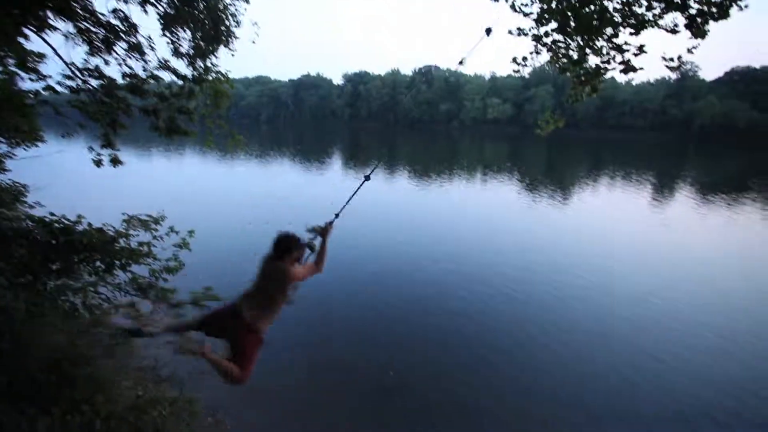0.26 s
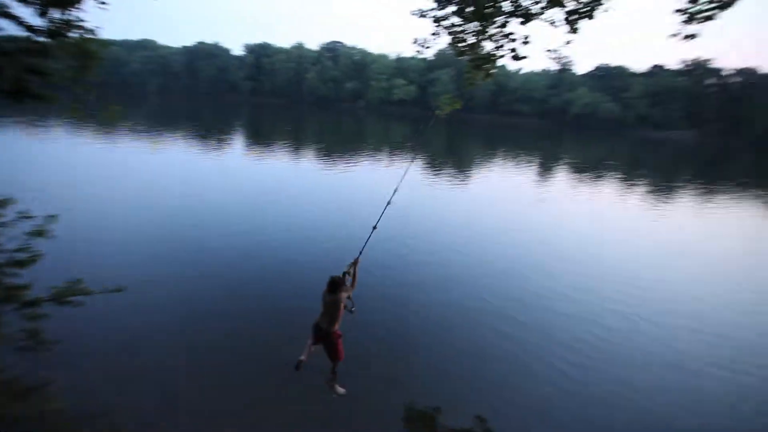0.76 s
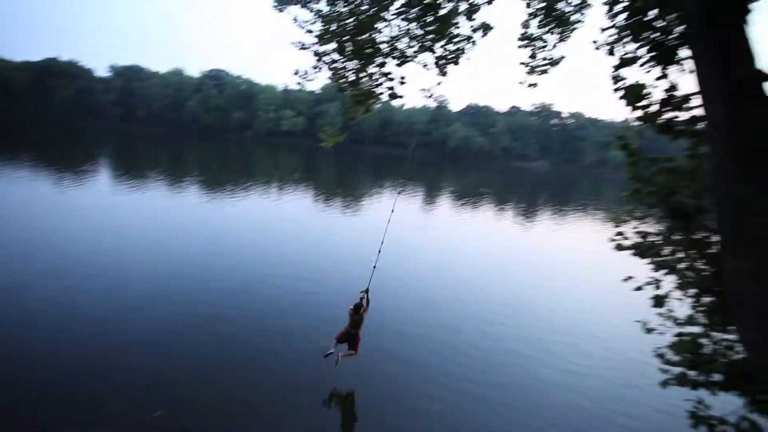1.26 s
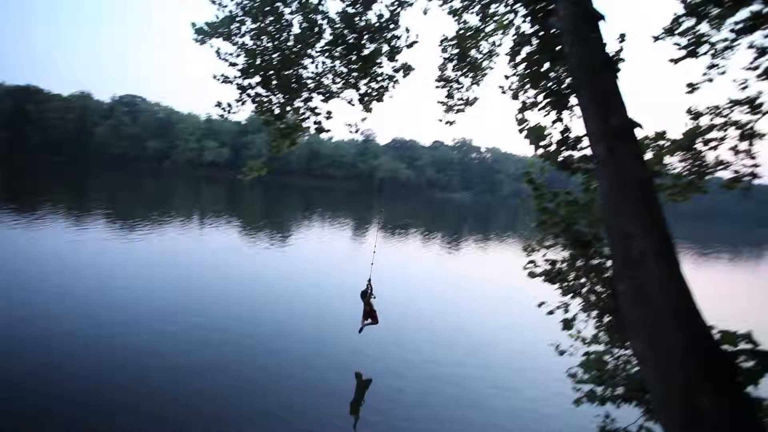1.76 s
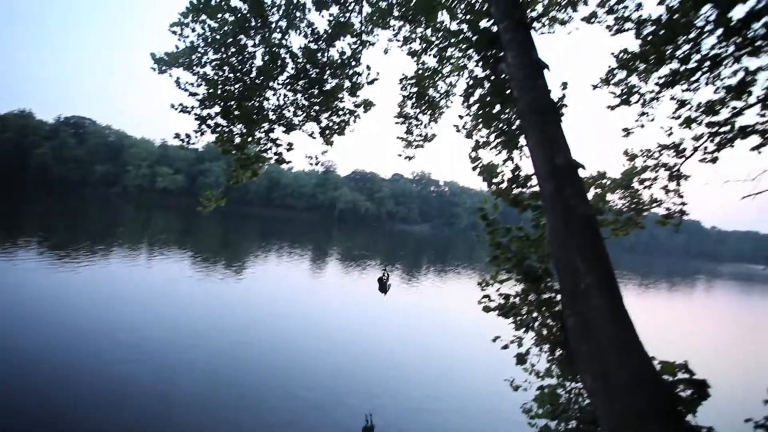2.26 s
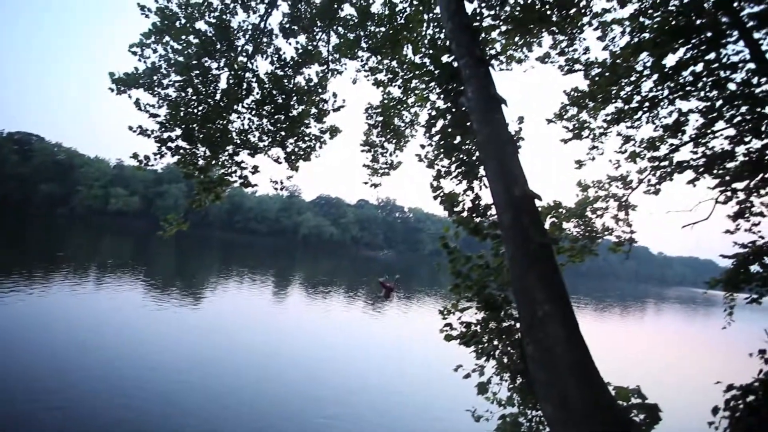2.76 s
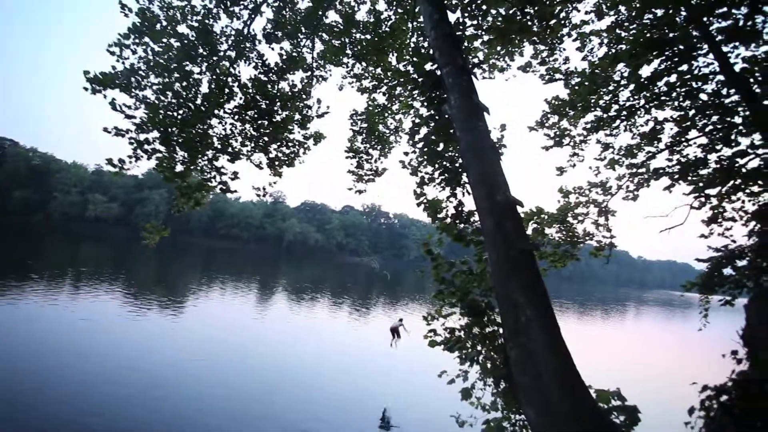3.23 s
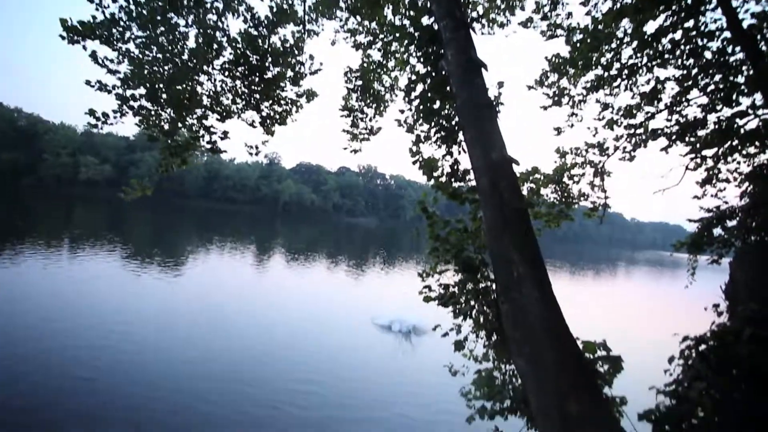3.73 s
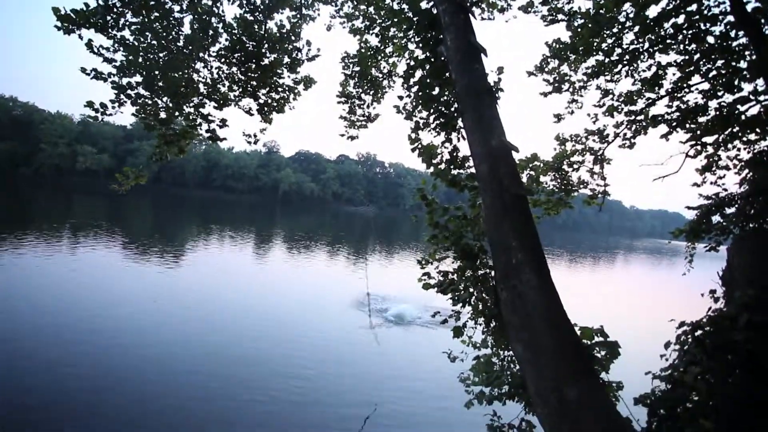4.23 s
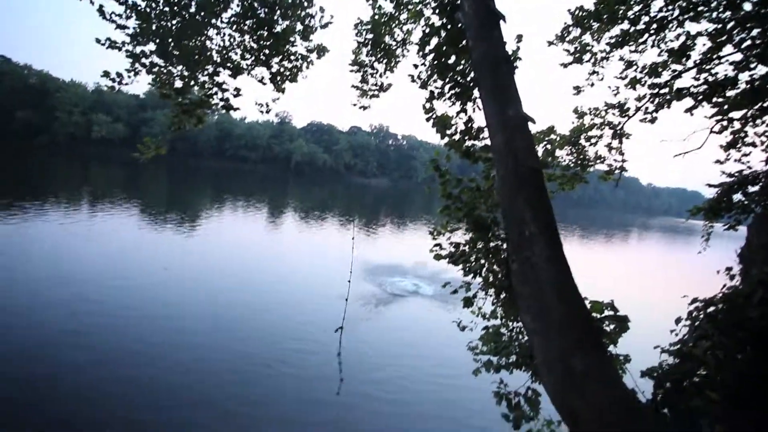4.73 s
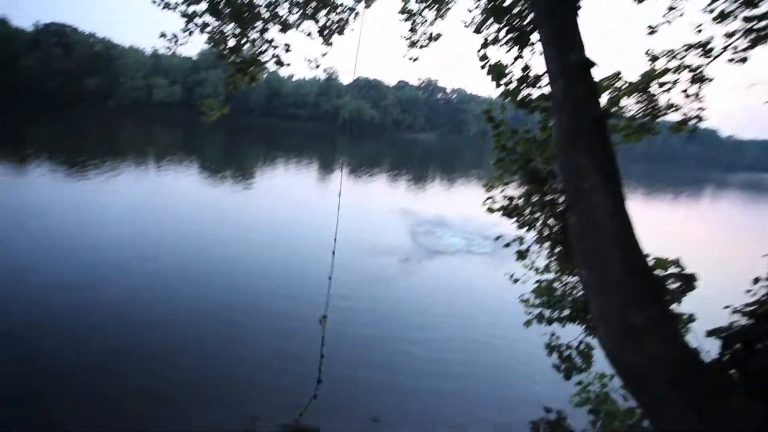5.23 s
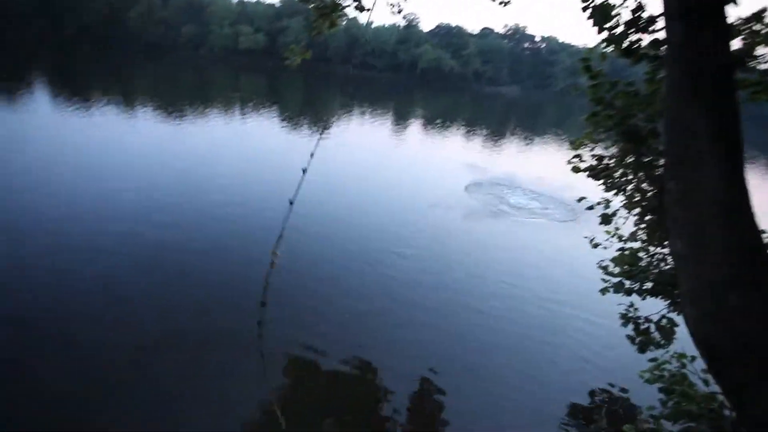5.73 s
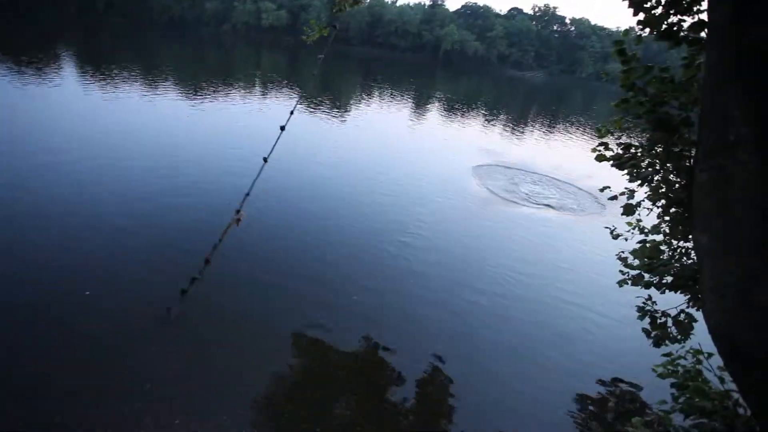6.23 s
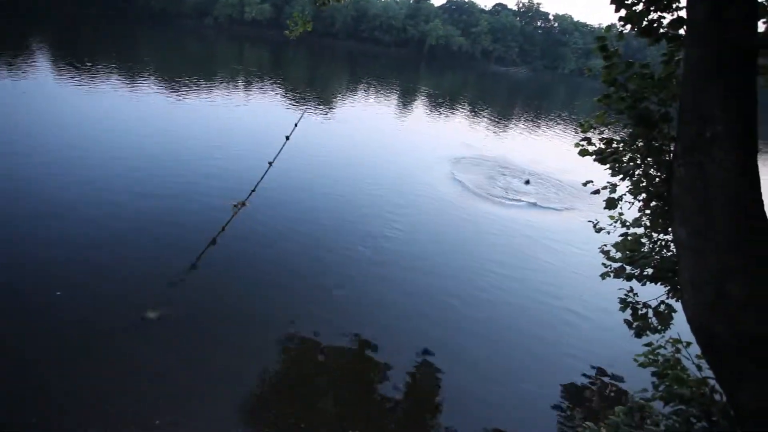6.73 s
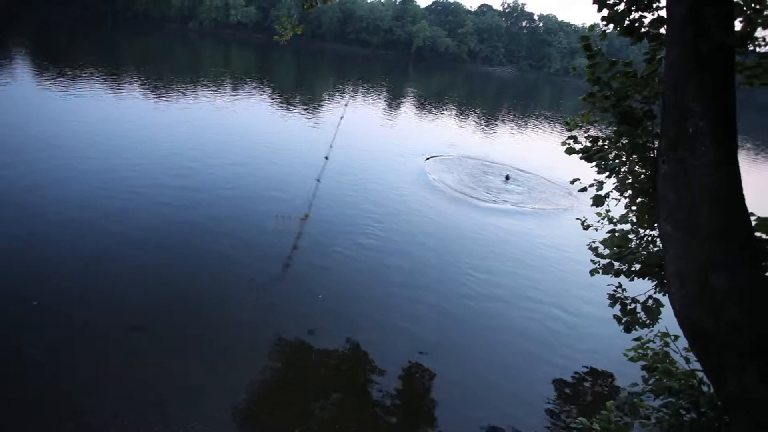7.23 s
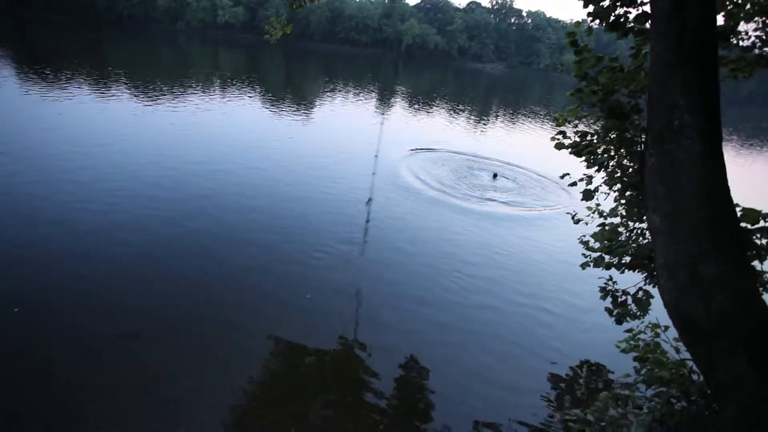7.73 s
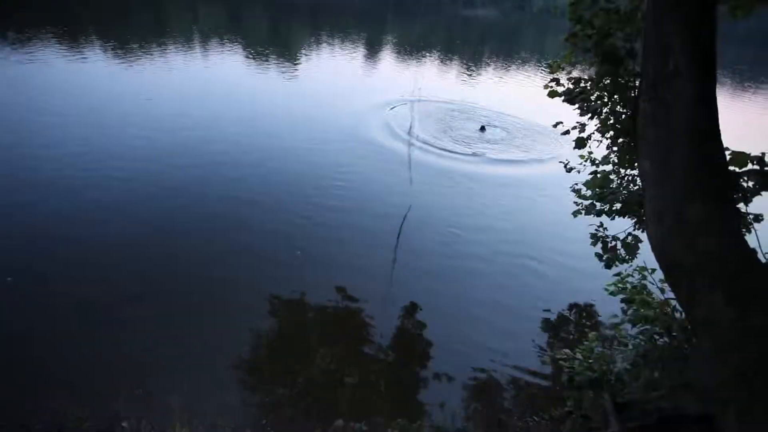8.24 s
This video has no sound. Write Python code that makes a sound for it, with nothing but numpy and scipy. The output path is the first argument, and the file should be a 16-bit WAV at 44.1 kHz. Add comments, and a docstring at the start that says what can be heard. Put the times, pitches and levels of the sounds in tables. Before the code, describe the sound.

Shrill cicadas run unbroken over a very low outdoor murmur. Right at the start comes a dry rope snap with a brief leafy brush, then a small woody creak. A single loud splash follows, cracking and overloading the mono microphone, with low booming air and a spray that patters away. Near the end a swimmer sloshes quietly, drops plink, and leaves stir slightly before an abrupt stop.

```python
"""Evening on a wooded lake shore: throughout, cicadas hiss as resonance-shaped noise over far rumble and murmur.
First a rope grip snaps (damped modes) and leaves rustle (grainy noise); about 2 s the rope creaks on its branch.
From 3.5 s the rider slaps the water (decaying noise), trapped air booms (gliding sines), froth and thrown water follow.
From 6.5 s a swimmer sloshes in bubbly gushes, single drops ring, and near the end leaves stir on the bank.
The mono microphone clips on the slaps; its gain control ducks after them and slowly recovers."""
import sys
import numpy as np
from scipy import signal
from scipy.fft import rfft, irfft, next_fast_len
from scipy.io import wavfile
from scipy.ndimage import uniform_filter1d, map_coordinates

SR = 44100
rng = np.random.default_rng(int(sys.argv[2]) if len(sys.argv) > 2 else 0)


def gain_from_db(level_db):
    """Convert decibel levels to linear amplitude factors (20 dB per decade)."""
    decades = np.asarray(level_db, float) / 20
    return 10 ** decades


def generate_wav(sig):
    """Save sig (samples, or channels by samples) to the path in sys.argv[1] as 16-bit PCM at SR."""
    pcm = np.round(np.clip(np.atleast_2d(sig).T, -1, 1) * 32767).astype(np.int16)
    wavfile.write(sys.argv[1], SR, pcm)


N = 374409

# Spectra below list relative spectral density; the layer is then normalised and given its own level.
# cicada chorus: t/s, level/dB
CHORUS_LEVEL = [(0, -13), (2, -13), (3.4, -12.5), (4.3, -11.5), (5.2, -13), (8.4, -12)]
# body resonance of the insects: f/Hz, level/dB
CICADA_SPECTRUM = [(1900, -49), (3200, -31.5), (4350, -11.5), (5180, -9), (6210, 0), (7250, -3),
                   (8870, -12), (10100, -26), (11000, -35), (12500, -38.5), (14000, -45), (16000, -52)]
# distant background: t/s, murmur level/dB, rumble level/dB
FAR_LEVELS = [(0, -31, -37), (.5, -33, -41.5), (1.3, -34, -39.5), (3.4, -35.5, -38), (6, -37, -40),
              (8.4, -39.5, -41.5)]
# far murmur: f/Hz, level/dB
MURMUR_SPECTRUM = [(120, -24.5), (200, -6.5), (318, -8), (391, -13.5), (520, -14.5), (656, -12), (1530, -9),
                   (2570, -18.5), (3500, -19), (4550, -53)]
# far rumble: f/Hz, level/dB
RUMBLE_SPECTRUM = [(20, -29.5), (32, -16), (52, 0.5), (100, -1), (180, -2), (300, -13.5), (500, -34)]
# wavering low tones: f/Hz, width/Hz, level/dB
DRONE_TONES = [(86.4, 13, -43.5), (107.8, 2.4, -46)]
# envelope of a throbbing low tone: t/s, level/dB, hold/s, rise/(dB/s), fall/(dB/s)
HUM_ENVELOPE = (0.8, -39.5, 2, 90, 5.5)
HUM_HZ, BEAT_HZ, BEAT_DEPTH = 225.3, 14, 0.57

# rope grip snapping tight: t/s, level/dB
GRIP_SNAP = (.039, 0.96)
# modes of the grip: f/Hz, relative level/dB, t60/s
GRIP_MODES = [(1930, -1.5, 0.024), (2460, -2.5, 0.019), (3530, 8, 0.0084), (10500, -36.5, .006)]
# leaves brushed at take-off, later stirred on the bank: t/s, level/dB, hold/s, rise/(dB/s), fall/(dB/s)
LEAF_RUSTLES = [(0.152, -12, 0.046, 221, 109), (8.2, -33, .2, 40, 100)]
# rustling leaves: f/Hz, level/dB
LEAF_SPECTRUM = [(500, -20), (1200, -11.5), (2500, -7), (4000, -1.5), (7000, 6.5), (13000, -18),
                 (16000, -19.5)]
# rope slipping on its branch: t/s, level/dB
ROPE_CREAKS = [(2.125, -29), (2.15, -26.5), (2.18, -22.5), (2.24, -26.5)]
# modes of the branch: f/Hz, relative level/dB, t60/s
BRANCH_MODES = [(550, 5.5, 0.047), (990, 1, 0.035), (1550, 0, .03)]

# churned, then falling water: t/s, level/dB, treble lean/dB
WATER_LEVELS = [(3.47, -84, -0.5), (3.475, -15, 1.5), (3.56, -15.5, 0.5), (3.61, -16, 9), (3.72, -18, 3),
                (3.95, -19, 0.5), (4.2, -14.5, 1.5), (4.7, -20, -0.5), (5.5, -30, -2), (6.4, -54.5, -5.5)]
# falling water: f/Hz, level/dB
SPRAY_SPECTRUM = [(120, -20), (250, -5), (450, -4.5), (660, -4), (850, -2.5), (1200, 0.5), (1450, -3.5),
                  (1700, -1.5), (2500, -2), (5000, 0.5), (9000, -3), (13000, -20), (16000, -28)]
# froth at the impact and under the falling water: t/s, level/dB, hold/s, rise/(dB/s), fall/(dB/s)
FROTH_BURSTS = [(3.472, -24.5, 0.065, 9000, 60), (4.45, -28.5, .2, 11, 19)]
# favoured froth bubbles: f/Hz, relative share
FROTH_BUBBLES = [(430, 1), (540, 1), (648, 3), (1192, 2), (1650, 1)]
# limbs and body slapping the surface: t/s, level/dB, t60/s, centre of the crack f/Hz
WATER_SLAPS = [(3.476, -5.5, 0.018, 4200), (3.488, -21.5, 0.0065, 8000), (3.511, -4, 0.022, 3200),
               (3.571, 2.5, .003, 9000), (3.591, 8.5, 0.0064, 6470), (3.593, 10.5, 0.0072, 5080)]
# trapped air ringing as bubbles: t/s, f/Hz, level/dB
AIR_CAVITIES = [(3.476, 1106, -4), (3.511, 685, 6), (3.518, 130, -13), (3.52, 550, 1), (3.591, 1730, 8),
                (3.5905, 4900, 8.5), (3.701, 133, -3.5), (3.801, 159, -5), (3.951, 168, -13),
                (3.96, 395, -15), (3.976, 201, -12)]
CAVITY_CYCLES, CAVITY_LEAST_S = 11, 0.0053  # t60 = cycles / pitch + least
# the plunge hole closing in gulps: t/s, level/dB
PLUNGE_GULPS = [(3.485, -30.5), (3.525, -22.5), (3.71, -19.5), (3.82, -26.5), (3.97, -23.5)]
GULP_RISE, GULP_FALL = 390, 100  # dB/s
# gurgle of the plunge hole: f/Hz, level/dB
GURGLE_SPECTRUM = [(50, -21), (110, 4), (200, -1.5), (450, -4.5), (900, -38)]

# swimmer's gushes: t/s, hold/s, gush level/dB, froth level/dB
SWIM_STROKES = [(6.487, 0.018, -34.5, -38.5), (6.89, .03, -36, -39), (7.046, 0.028, -37, -45),
                (7.215, 0.014, -39, -46), (7.352, .15, -35, -40), (8.208, 0.056, -39, -41.5),
                (8.33, .1, -36, -35)]
STROKE_RISE, STROKE_FALL = 127, 200  # dB/s
# stirred water: f/Hz, level/dB
SLOSH_SPECTRUM = [(200, -10), (450, -1.5), (900, 0.5), (1350, -12), (2500, -1), (4000, -3.5), (14000, -16),
                  (16000, -25)]
# favoured bubbles of the strokes: f/Hz, relative share
SWIM_BUBBLES = [(946, 0.73), (1330, 4), (1900, 1)]
# single falling drops: t/s, f/Hz, level/dB
FALLING_DRIPS = [(7.17, 1400, -27), (7.558, 2600, -27), (7.965, 1330, -27), (8.225, 2900, -27),
                 (8.339, 1145, -23), (8.345, 2410, -20)]
DRIP_CYCLES = 95  # t60 in cycles

END_S, GAIN_LAG_S = 8.377, .008  # sound stops; delay of the gain control


def unit(x):
    """Normalisation to rms 1."""
    return x / np.sqrt(np.mean(x ** 2) + 1e-20)


def curves(rows):
    """Linear interpolation in time: one value per sample for each column after the time."""
    s, *columns = np.transpose(rows)
    return [np.interp(np.arange(N) / SR, s, column) for column in columns]


def wobble(rate):
    """Slow random modulation: a smooth curve through `rate` random knots a second."""
    knots = rng.standard_normal(int(N * rate / SR) + 4)
    return map_coordinates(knots, [np.arange(N) * rate / SR])


def filtered(x, response):
    """Linear filtering: the spectrum times a response of frequency, then rms 1."""
    size = next_fast_len(len(x) + 8192)
    hz = np.fft.rfftfreq(size, 1 / SR) + 1  # offset keeps the logarithm finite
    return unit(irfft(rfft(x, size) * response(hz), size)[:len(x)])


def coloured(x, spectrum):
    """Spectral shaping by points of f/Hz and level/dB on a logarithmic frequency axis."""
    f, db = np.transpose(spectrum)
    return filtered(x, lambda hz: gain_from_db(np.interp(np.log(hz), np.log(f), db, -120, -120)))


def grainy(share, scatter_db):
    """Granular noise: a power share of heavy-tailed samples of scattered size in Gaussian noise."""
    grains = rng.standard_normal(N) * gain_from_db(scatter_db * rng.standard_normal(N))
    share = np.clip(share, 0, 1)
    return np.sqrt(1 - share) * rng.standard_normal(N) + np.sqrt(share) * unit(grains)


def ring(modes, rise=0., attack=0.00052):
    """Modal decay: damped sines whose pitch glides up by the fraction 2 * rise over each t60."""
    t = np.arange(SR // 2) / SR
    onset = 1 - np.exp(-t / attack)
    return onset * sum(gain_from_db(db - 60 * t / t60) * np.sin(2 * np.pi * hz * t * (1 + rise * t / t60))
                       for hz, db, t60 in modes)


def add(track, s, sound):
    """Superposition: mixes a sound into the track at time s."""
    start = round(s * SR)
    track[start:][:len(sound)] += sound[:N - start]


def burst(s, db, hold, rise, fall):
    """Exponential envelope: gain climbs to db at time s, holds, then falls (rise and fall in dB/s)."""
    span = 120  # dB below the peak at either end
    times = [s - span / rise, s, s + hold, s + hold + span / fall]
    t = np.arange(N, dtype=np.float32) / SR
    return gain_from_db(np.interp(t, times, [db - span, db, db, db - span]).astype(np.float32))


def bubbles(count, span, sizes, spread, cycles):
    """Bubble resonance: random soft pings of rising pitch about favoured sizes; rms 1 over the span."""
    place, kind, size = rng.random((count, 3)).T[:, :, None]
    pitch_hz, share = np.transpose(sizes)
    chosen = np.searchsorted(np.cumsum(share), kind * share.sum())
    hz = pitch_hz[chosen] * np.exp(spread * rng.standard_normal((count, 1)))
    samples = np.arange(SR // 25)
    turns = hz * samples / SR
    envelope = turns * np.exp(-4 * turns / cycles)
    ping = np.sin(2 * np.pi * turns * (1 + 0.086 * turns / cycles / 2)) * envelope
    start = (SR * (span[0] + place * (span[1] - span[0]))).astype(int)
    track = np.bincount((start + samples).ravel(), (ping * gain_from_db(7.4 * size)).ravel(), N + SR)[:N]
    return unit(track) * np.sqrt((span[1] - span[0]) * SR / N)


def cicadas():
    """Resonant filtering: grainy noise, as of fused tymbal clicks, shaped by the insects' body resonance."""
    swell_db = 0.093 * wobble(1.8) + 0.27 * wobble(13) + 0.22 * wobble(120)
    hiss = coloured(grainy(share=0.27, scatter_db=3.5), CICADA_SPECTRUM)
    return gain_from_db(curves(CHORUS_LEVEL)[0] + swell_db) * hiss


def narrow_noise(centre_hz, width_hz):
    """Narrow-band resonance: noise confined about one frequency wavers like an unsteady tone."""
    return filtered(rng.standard_normal(N), lambda hz: 1 / (1 + ((hz - centre_hz) / width_hz * 2) ** 2))


def distance():
    """Band-limited noise and amplitude modulation: far murmur and rumble, low drones and a beating hum."""
    murmur_db, rumble_db = curves(FAR_LEVELS)
    murmur = gain_from_db(murmur_db + 0.42 * wobble(4.0)) * coloured(rng.standard_normal(N), MURMUR_SPECTRUM)
    rumble = gain_from_db(rumble_db + 0.97 * wobble(3.5)) * coloured(rng.standard_normal(N), RUMBLE_SPECTRUM)
    phase = 2 * np.pi * np.cumsum(HUM_HZ + 2.2 * wobble(8)) / SR
    beat_phase = 2 * np.pi * np.cumsum(BEAT_HZ + 0.53 * wobble(3.13)) / SR
    throb = 1 + BEAT_DEPTH * np.sin(beat_phase)
    hum = burst(*HUM_ENVELOPE) * gain_from_db(2.0 * wobble(2.4)) * unit(throb * np.sin(phase))
    drone = sum(gain_from_db(db) * narrow_noise(hz, width) for hz, width, db in DRONE_TONES)
    return murmur + rumble + drone + hum


def swing():
    """Impulse excitation of modes: the grip snaps and the branch creaks; brushed leaves give grainy noise."""
    rustle_gain = sum(burst(*row) for row in LEAF_RUSTLES) * gain_from_db(2.4 * wobble(50))
    out = rustle_gain * coloured(grainy(share=0.2, scatter_db=5.5), LEAF_SPECTRUM)
    snap_s, snap_db = GRIP_SNAP
    add(out, snap_s, gain_from_db(snap_db) * ring(GRIP_MODES))
    for s, db in ROPE_CREAKS:
        add(out, s, gain_from_db(db) * ring(BRANCH_MODES, attack=0.0026))
    return out


def thrown_water():
    """Random superposition of drops: grainy noise whose treble lean shifts the balance about 1500 Hz."""
    level_db, lean_db = curves(WATER_LEVELS)
    drops = coloured(grainy(share=0.48, scatter_db=6.5), SPRAY_SPECTRUM)
    bright = signal.lfilter(*signal.butter(1, 1500, "high", fs=SR), drops)
    dull = drops - bright
    return gain_from_db(level_db + 0.81 * wobble(25)) * (gain_from_db(-lean_db) * dull + gain_from_db(lean_db) * (drops - dull))


def slap(db, t60, centre_hz):
    """Broadband impact: a brief band of noise about centre_hz dies away exponentially."""
    t = np.arange(SR // 10) / SR
    crack = filtered(rng.standard_normal(len(t)),
                     lambda hz: 1 / np.hypot(1 + .25 * centre_hz / hz, (hz / centre_hz) ** 3))
    fade = gain_from_db(-60 * t / t60)
    return gain_from_db(db) * unit(crack * fade) * np.sqrt(np.mean(fade ** 2))


def splash():
    """Impact and cavity resonance: slaps, ringing air pockets, froth, a low gurgle and thrown water."""
    out = thrown_water()
    froth_gain = sum(burst(*row) for row in FROTH_BURSTS)
    out += froth_gain * bubbles(count=1800, span=(3.47, 6.4), sizes=FROTH_BUBBLES, spread=0.057, cycles=13.0)
    gulps = sum(burst(s, db, 0, GULP_RISE, GULP_FALL) for s, db in PLUNGE_GULPS)
    out += gulps * gain_from_db(1.3 * wobble(40)) * coloured(rng.standard_normal(N), GURGLE_SPECTRUM)
    for s, db, t60, centre_hz in WATER_SLAPS:
        add(out, s, slap(db, t60, centre_hz))
    for s, hz, db in AIR_CAVITIES:
        t60 = CAVITY_CYCLES / hz + CAVITY_LEAST_S
        add(out, s, ring([(hz, db, t60)], rise=0.033, attack=min(.003, 2.5 / hz)))
    return out


def swimmer():
    """Stirred flow and bubble resonance: arms make soft, frothy gushes; a few drops ring singly."""
    gush = sum(burst(s, db, hold, STROKE_RISE, STROKE_FALL) for s, hold, db, _ in SWIM_STROKES)
    froth = sum(burst(s, froth_db, hold, STROKE_RISE, STROKE_FALL) for s, hold, _, froth_db in SWIM_STROKES)
    out = gush * gain_from_db(0.89 * wobble(30)) * coloured(grainy(share=0.46, scatter_db=12.5), SLOSH_SPECTRUM)
    out += froth * bubbles(count=900, span=(6.3, 8.4), sizes=SWIM_BUBBLES, spread=0.042, cycles=13.4)
    for s, hz, db in FALLING_DRIPS:
        add(out, s, ring([(hz, db, DRIP_CYCLES / hz)], rise=0.13, attack=.002))
    return out


def scene():
    """Superposition: all sources sum at one microphone, given to two equal channels."""
    return np.tile(cicadas() + distance() + swing() + splash() + swimmer(), (2, 1))


def gain_control(x):
    """Level compression: gain drops just after a loud burst, holds, then recovers fast and later slowly."""
    limit_db, hold_s = -8.5, 0.18
    fast, slow, knee_db = 17.1, 3.27, 4.5  # recovery in dB/s above and below a cut of knee_db
    cut_db = 3.0  # cut at the start
    hop = SR // 2000
    power = np.abs(uniform_filter1d(x ** 2, round(0.0023 * SR)))[::hop]
    loud_db = 10 * np.log10(power + 1e-12)
    cuts, wait = [], 0
    for over_db in loud_db - limit_db:
        if over_db > cut_db:
            cut_db, wait = over_db, hold_s
        wait -= hop / SR
        if wait < 0:
            recovery = fast if cut_db > knee_db else slow
            cut_db = max(0, cut_db - recovery * hop / SR)
        cuts.append(cut_db)
    cut_times = np.arange(len(cuts)) * hop / SR
    return gain_from_db(-np.interp(np.arange(N) / SR - GAIN_LAG_S, cut_times, cuts))


def band_limit(x):
    """A steep low-pass at the top of the band."""
    return signal.sosfilt(signal.butter(12, 15750, fs=SR, output="sos"), x)


def record(dry):
    """Saturation: gain control, then hard clipping at full scale, with silence after END_S."""
    clipped = np.clip(dry * gain_control(dry[0]), -1, 1)
    mix = clipped * (np.arange(N) < END_S * SR)
    return band_limit(mix)


dry = scene()
out = record(dry)
generate_wav(out)
```